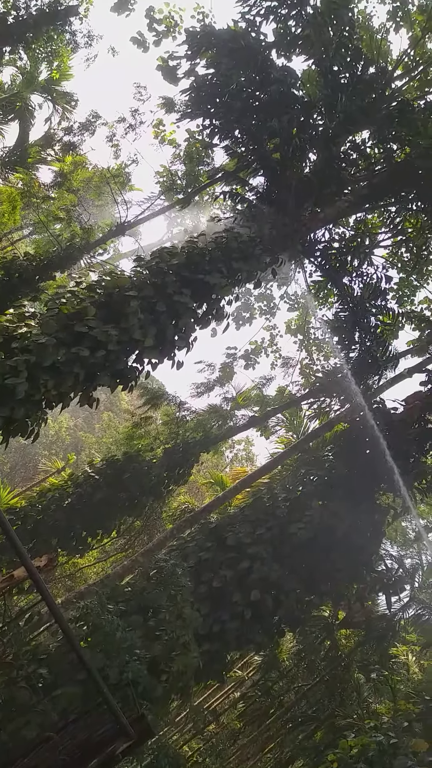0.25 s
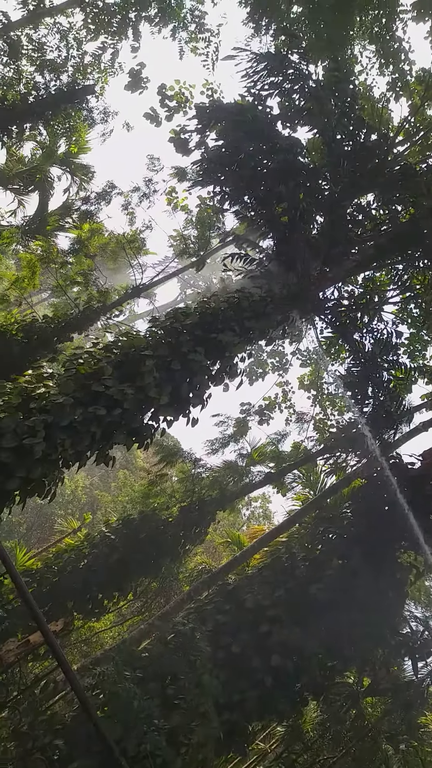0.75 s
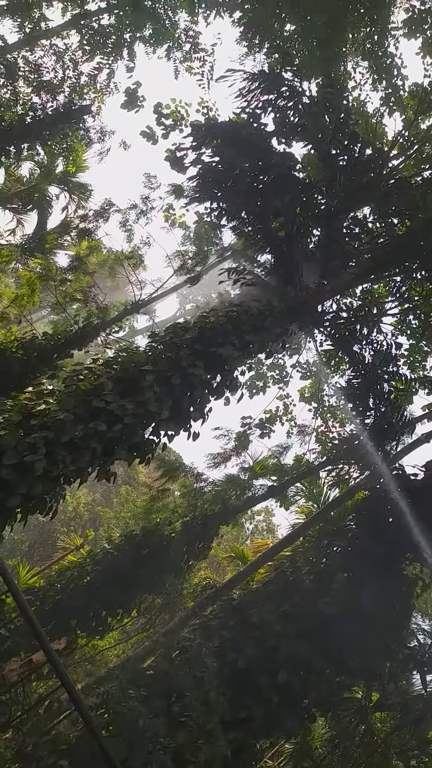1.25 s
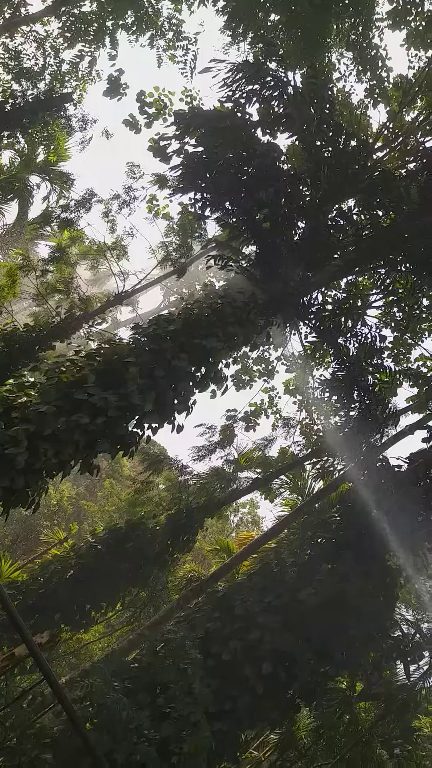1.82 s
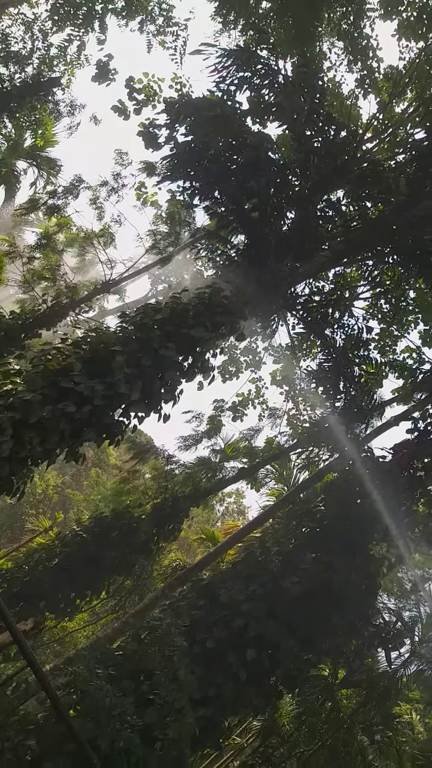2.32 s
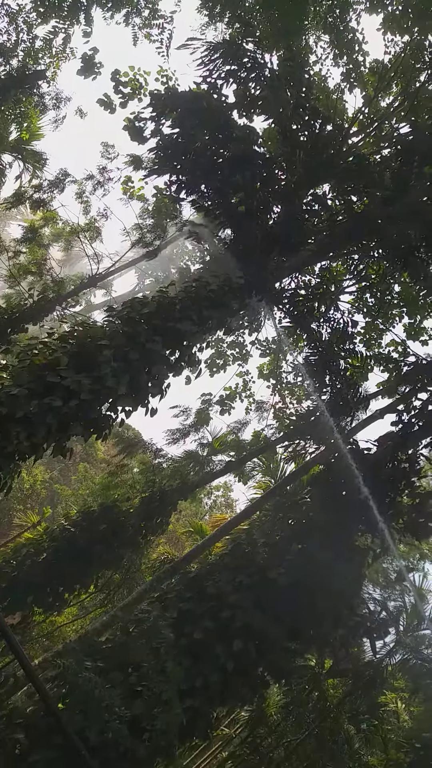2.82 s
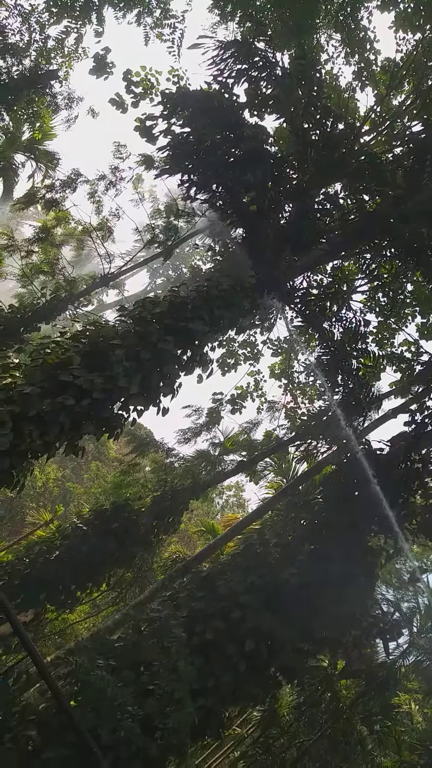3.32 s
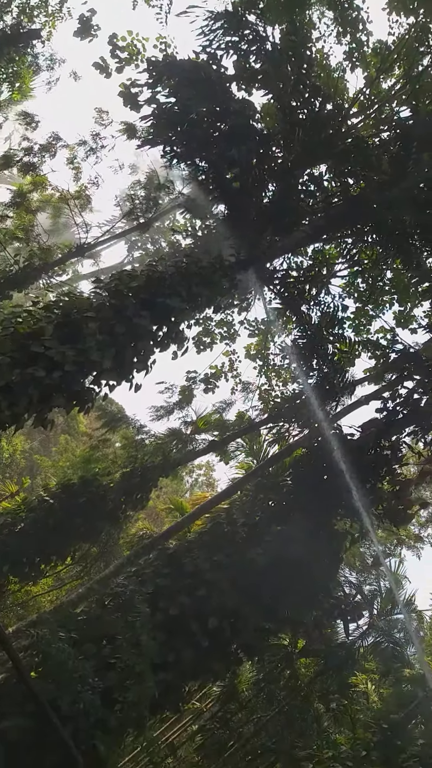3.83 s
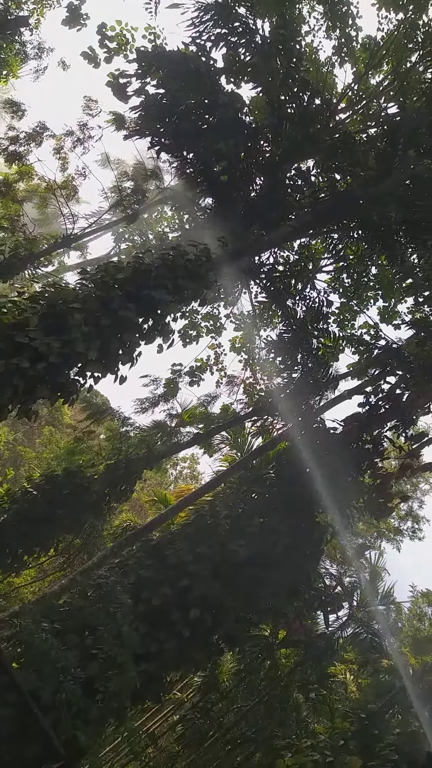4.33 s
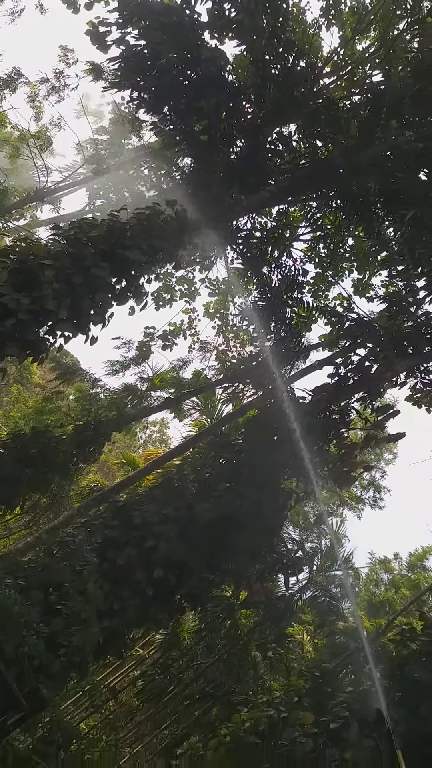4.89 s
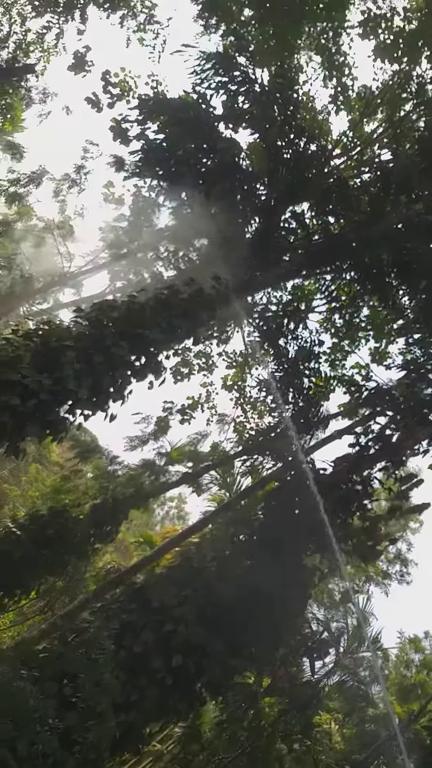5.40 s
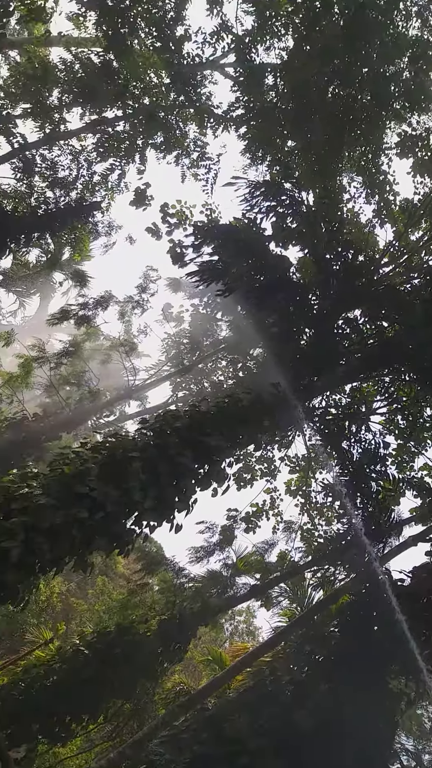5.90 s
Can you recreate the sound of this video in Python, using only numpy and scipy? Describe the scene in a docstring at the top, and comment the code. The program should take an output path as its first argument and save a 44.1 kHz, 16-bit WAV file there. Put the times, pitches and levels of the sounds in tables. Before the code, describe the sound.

Outdoors among leafy trees, a pressurised water jet hisses without pause and spatters on foliage. It starts moderate, surges into dense slapping and crackling after one second, settles into uneven patter, then bursts hard again near five and a half seconds. A soft rain wash and dull low thuds lie beneath, with a few faint bird chirps. Small device microphone, fairly close, bright and thin with little bass.

```python
"""A sprinkler jet sweeps through tree leaves in a grove, picked up by a small two-port microphone.
One shower of noisy drops is filtered into spatter, patter, slaps and drumming, swelling at crossings and gouts.
Dense tiny bursts make the nozzle hiss, narrow noise bands sing on single leaves, and low noise thuds on the ground.
Behind it lie a rain wash of patchy noise with a steady low-pitched part, and gliding whistles of far birds."""
import sys
import numpy as np
from scipy import signal
from scipy.fft import rfft, irfft, next_fast_len
from scipy.io import wavfile
from scipy.ndimage import uniform_filter1d

SR = 44100
rng = np.random.default_rng(int(sys.argv[2]) if len(sys.argv) > 2 else 0)


def to_wav(s):
    """Save 16-bit WAV."""
    ch = np.atleast_2d(s).T  # columns
    pcm = np.round(np.clip(ch, -1, 1) * 32767)  # PCM
    wavfile.write(sys.argv[1], SR, pcm.astype(np.int16))


N = 271215  # length in samples


def gain_of(db):
    """Turns dB into an amplitude factor."""
    return 10 ** (np.asarray(db) / 20)


def evened(x):
    """Scales a signal to rms 1."""
    return x / np.sqrt(np.mean(x ** 2) + 1e-20)


def read(points, hz, axis=1):
    """Joins a table of (Hz, value, ..) by straight lines on a log-frequency axis."""
    table = np.transpose(points)
    return np.interp(np.log(hz + 1), np.log(table[0] + 1), table[axis])


def curve(table, axis):
    """Joins a dB column of a time table by straight lines and gives a gain per sample."""
    rows = np.transpose(table)
    return gain_of(np.interp(np.arange(N) / SR, rows[0], rows[axis]))


def coloured(x, db_points):
    """Filters a whole signal by a spectrum in dB."""
    size = next_fast_len(len(x))
    hz = np.fft.rfftfreq(size, 1 / SR)
    return irfft(rfft(x, size) * gain_of(read(db_points, hz)), size)[:len(x)]


def band_level(x, points, lo_hz, hi_hz):
    """Colours x and scales it to rms 1 between lo_hz and hi_hz as heard through the overall colour."""
    x = coloured(x, points)
    heard = rfft(coloured(x, COLOUR_BASS + COLOUR_TREBLE))
    hz = np.fft.rfftfreq(len(x), 1 / SR)
    inside = (hz > lo_hz) & (hz < hi_hz)
    return x * len(x) / np.sqrt(2 * np.sum(abs(heard[inside]) ** 2))


FRAME, HOP = 512, 128  # spectral frame and step, samples


def patchy(x, patch_db, flicker_db):
    """Lets patches of time and frequency swell and fade, and the whole flicker as gouts of water land."""
    z = signal.stft(x, nperseg=FRAME, noverlap=FRAME - HOP)[2]
    patches = rng.standard_normal(z.shape[::-1]).T
    patches = uniform_filter1d(patches, size=8, axis=0)  # frequency bins
    patches = evened(uniform_filter1d(patches, size=14, axis=1))  # time frames
    flicker = evened(uniform_filter1d(rng.standard_normal(z.shape[1]), size=12))
    z = z * gain_of(patch_db * patches + flicker_db * flicker)
    return evened(signal.istft(z, nperseg=FRAME, noverlap=FRAME - HOP)[1][:N])


def drops(per_s, spread_db, ring_s, count=16):
    """Drops of random size each ring one leaf: a noise burst dying within ring_s; all leaves sum to white."""
    size_db = spread_db * np.minimum(rng.exponential(1, N), 4.2)
    size = gain_of(size_db) * (rng.random(N) < per_s / SR)
    leaf, t = rng.integers(0, count, N), np.arange(512) / SR
    spectra = rfft(rng.standard_normal((count, len(t))) * gain_of(-60 * t / ring_s))
    # whiten the leaves as a set, then centre each burst in its window
    spectra = spectra / np.sqrt(np.mean(abs(spectra) ** 2, axis=0))
    taps = np.roll(irfft(spectra), len(t) // 2, axis=1)
    return evened(sum(signal.oaconvolve(size * (leaf == k), tap)[:N] for k, tap in enumerate(taps)))


def wobble(size, width_hz):
    """A randomly turning phasor of rms 1 whose spectrum is width_hz wide."""
    r = np.exp(-np.pi * width_hz / SR)
    z = rng.standard_normal((28000, 2)) @ [1, 1j]  # longer than any note, so the filter has settled
    return signal.lfilter([1], [1, -r], z)[-size:] * np.sqrt((1 - r * r) / 2)


def note(s, length, start_hz, end_hz, db, width_hz, pure):
    """A glide placed at s, part pure tone and part narrow noise, with the overall colour undone at start_hz."""
    t, out = np.arange(round(length * SR)) / SR, np.zeros(N)
    glide_hz = start_hz + (end_hz - start_hz) * t / length
    tone = np.exp(2j * np.pi * np.cumsum(glide_hz) / SR)
    pure = np.clip(pure, 0, 1)
    blurred = tone * (pure + np.sqrt(1 - pure ** 2) * wobble(len(t), width_hz))
    level = gain_of(db - read(COLOUR_BASS + COLOUR_TREBLE, start_hz))
    shaped = level * np.sqrt(2) * blurred.real * signal.windows.tukey(len(t), .5)
    part = out[round(s * SR):][:len(t)]
    part += shaped[:len(part)]
    return out


def grove(x, low_db=1.9, high_db=1.1):
    """Echoes off trunks and ground lay a fine ripple over the spectrum, which drifts at random."""
    hz, _, z = signal.stft(x, SR, nperseg=2048)
    ripple = rng.standard_normal(z.shape[::-1]).T
    ripple = uniform_filter1d(ripple, size=3, axis=0)
    ripple = evened(uniform_filter1d(ripple, size=16, axis=1))
    depth_db = read([(300, .6), (900, low_db), (8000, high_db)], hz)[:, None]
    return signal.istft(z * gain_of(depth_db * ripple), SR, nperseg=2048)[1][:N]


# Tone of the low part of the rain wash. Each row: frequency in Hz, relative level in dB.
RAIN_BASS = [(30, 0.5), (105, 0), (150, -7), (260, -8), (330, -2.5), (520, 0), (650, -0.5), (900, -15)]
RAIN_BASS_DB = -77.5  # between 35 and 110 Hz


def rain_bass():
    """The steady low-pitched part of the rain wash: dull, even noise under the water."""
    return gain_of(RAIN_BASS_DB) * band_level(rng.standard_normal(N), RAIN_BASS, 35, 110)


# Tone of the rain of drops. Each row: frequency in Hz, relative level in dB.
RAIN = [(30, 13), (100, 1.5), (400, 0.5), (2000, 0), (6000, -3), (12000, -0.5)]
RAIN_DB = -37.5  # before the overall trim


def rain():
    """Drops falling through the grove blend into a far, even wash of gently patchy noise."""
    wash = patchy(rng.standard_normal(N), patch_db=1.0, flicker_db=.3)
    return gain_of(RAIN_DB) * band_level(wash, RAIN, 20, 20600)


# Far bird calls. Each row: start in seconds, length in seconds, start pitch in Hz, end pitch in Hz,
# level in dB, blur width in Hz.
BIRDS = [(1.875, .1, 1160, 1217, -42, 70), (1.93, 0.053, 4680, 4600, -33, 90),
         (2.14, .065, 3950, 3820, -35, 60), (2.52, 0.059, 3100, 3000, -41, 50),
         (2.72, 0.047, 3140, 3090, -40, 50), (2.97, 0.084, 3180, 3100, -42, 50),
         (3.14, .09, 1200, 1173, -41.5, 80), (3.23, .12, 1170, 1124, -44.5, 80),
         (3.23, .09, 3150, 3180, -40, 50), (5.891, .029, 2980, 2960, -35.5, 40),
         (5.921, .03, 3020, 3000, -35.5, 40)]


def birds():
    """Short gliding whistles, blurred by distance and foliage."""
    return sum(note(*row, pure=.93) for row in BIRDS)


# Water landing on soft ground. Each row: time in seconds, level in dB before the overall trim.
GROUND = [(0.0, -73), (0.3, -67), (1.05, -65), (1.19, -55.5), (1.6, -59), (1.73, -69), (1.87, -62),
          (2.2, -60), (2.5, -62), (2.72, -67), (3.94, -72), (4.5, -62.5), (4.86, -56), (4.95, -64.5),
          (6.15, -68)]
# Tone of the ground thud. Each row: frequency in Hz, relative level in dB.
THUD = [(70, -25), (135, -6), (200, -2), (280, -6), (500, -40)]
LUMPY_DB = 1.5  # rms depth of the slow level lumps


def ground_thud():
    """Water on soft ground gives a low, dull noise whose level lumps up and down."""
    lumps = evened(uniform_filter1d(rng.standard_normal(N), size=4000))
    thud = band_level(rng.standard_normal(N), THUD, 120, 267)
    return thud * curve(GROUND, axis=1) * gain_of(LUMPY_DB * lumps)


# The jet rests on one leaf or stem. Each row: start in seconds, length in seconds, centre in Hz,
# level in dB before the overall trim, bandwidth in Hz.
SINGING = [(.5, .15, 900, -39.5, 200), (1.87, 0.09, 4900, -35, 500), (2.35, .07, 4900, -34, 400),
           (3.3, 0.042, 3750, -36, 300), (4.432, 0.084, 4710, -33, 400), (4.722, .06, 2380, -35, 250),
           (4.8, .55, 2550, -40, 400), (5.479, .16, 4310, -31.5, 300), (5.49, 0.31, 5840, -34, 350),
           (6.1, .05, 3680, -38, 400)]


def singing():
    """A leaf or stem held in the jet sings as a narrow band of noise that swells and fades."""
    return sum(note(s, length, hz, hz, db, width_hz, pure=0) for s, length, hz, db, width_hz in SINGING)


# Nozzle hiss. Each row: time in seconds, level in dB before the overall trim.
NOZZLE = [(0.0, -40.5), (0.49, -37.5), (1.05, -39), (1.44, -37), (1.78, -39), (2.17, -37), (2.65, -40),
          (3.32, -39), (3.8, -44), (4.15, -39), (4.64, -35), (4.76, -38), (5.34, -37), (5.43, -34),
          (5.57, -32), (5.84, -38.5), (6.15, -39.5)]
# Tone of the hiss. Each row: frequency in Hz, relative level in dB.
HISS = [(1500, -22), (5000, -15.5), (9000, -1.5), (12000, 0.5), (15500, 0.5)]


def nozzle():
    """Fine spray tearing off the jet: a dense fizz of tiny bursts."""
    bursts = drops(12000, spread_db=3.0, ring_s=.0015)
    fizz = patchy(bursts + 0.38 * rng.standard_normal(N), patch_db=1.0, flicker_db=0.54)
    return band_level(fizz, HISS, 10200, 15530) * curve(NOZZLE, axis=1)


RISE_S, FALL_DB_PER_S = 0.046, 48


def crossing(start, hold):
    """A quick linear rise as the jet meets thick growth, a hold, then an even fall in dB."""
    t = np.arange(N) / SR - start
    fall_db = -FALL_DB_PER_S * np.maximum(t - RISE_S - hold, 0)
    return np.clip(t / RISE_S, 0, 1) * gain_of(fall_db)


# All levels in these three tables are before the overall trim.
# The jet wandering in thin foliage. Each row: time in seconds, fine spatter in dB,
# slap on broad leaves in dB, drumming on thick growth in dB.
JET = [(0.0, -42.5, -36.5, -43), (0.43, -39, -38.5, -46), (0.8, -34, -40.5, -48), (0.97, -33.5, -40, -49),
       (1.7, -35, -44, -52), (1.86, -39, -42, -48), (1.95, -34, -42, -47), (2.16, -35, -41, -48),
       (2.28, -34.5, -36, -44), (2.6, -36.5, -36, -44), (2.89, -39, -37.5, -47), (3.13, -34.5, -39, -48),
       (3.5, -39, -41, -51), (3.96, -37.5, -40.5, -50), (4.6, -31.5, -40.5, -48), (4.74, -34, -35.5, -46),
       (5.36, -33.5, -36, -44), (5.86, -34.5, -42, -50), (6.15, -35.5, -38.5, -46)]
# The jet crosses thick growth. Each row: start in seconds, hold in seconds, fine spatter in dB,
# slap in dB, drumming in dB.
CROSSINGS = [(0.474, 0.12, -32, -35, -40), (1.022, 0.4, -28.5, -32.5, -44), (5.374, 0.25, -28, -34, -42.5)]
# Single gouts slapping a leaf. Each row: peak time in seconds, fine spatter in dB, slap in dB, drumming in dB.
GOUTS = [(.515, -34, -37, -39), (1.011, -34, -32, -41), (1.11, -35, -30, -42), (1.165, -32, -34, -45),
         (1.2, -34, -32, -43), (1.3, -35, -33, -41), (1.42, -30, -40, -46), (1.49, -39, -33, -44),
         (1.575, -30, -36, -46), (1.885, -35, -48, -48), (2.4, -33.5, -40, -45), (2.53, -39, -37, -45),
         (3.19, -40, -38.5, -45), (3.32, -34, -40.5, -45), (3.41, -35, -37.5, -49), (4.86, -34, -29.5, -39),
         (5.18, -35, -36, -44), (5.52, -32, -35, -36), (5.547, -27, -33, -40), (5.566, -29, -32, -32),
         (5.93, -35, -46, -50)]
GOUT_S = .012  # from the peak to 1/e of its power


def strengths():
    """Gains of spatter, slap and drumming: the powers of the wandering jet, crossings and gouts add."""
    t = np.arange(N) / SR
    power = np.array([curve(JET, axis=k) for k in (1, 2, 3)]) ** 2
    for start, hold, *db in CROSSINGS:
        power = power + np.outer(gain_of(db), crossing(start, hold)) ** 2
    for s, *db in GOUTS:
        bump = np.exp(-np.minimum(((t - s) / GOUT_S) ** 2, 50))
        power = power + np.outer(gain_of(db) ** 2, bump)
    return np.sqrt(power)


# Tones of the struck surfaces. Each row: frequency in Hz, relative level in dB.
SPATTER = [(2500, -29.5), (4300, -6.5), (5000, 0.5), (7000, 1), (9500, -2), (15000, -11)]
PATTER = [(2000, -26), (2900, -4.5), (3600, -0.5), (4400, -4.5), (6000, -28.5)]
SLAP = [(1100, -27.5), (1500, -3), (2000, -0.5), (2700, -4), (3800, -30.5)]
DRUMMING = [(200, -28), (400, -6), (900, -2.5), (1300, -1.5), (2000, -42)]
# patter lies between spatter and slap: share of spatter, offset in dB
PATTER_FINE, PATTER_DB = 0.54, -0.22


def jet():
    """One shower of drops drives every struck surface, so that they flicker together."""
    shower = drops(9000, spread_db=3.0, ring_s=.003) + 0.66 * rng.standard_normal(N)
    shower = patchy(shower, patch_db=0.73, flicker_db=0.17)
    fine, coarse, deep = strengths()
    between = gain_of(PATTER_DB) * fine ** PATTER_FINE * coarse ** (1 - PATTER_FINE)
    spatter = band_level(shower, SPATTER, 3900, 9600) * fine
    patter = band_level(shower, PATTER, 2400, 5300) * between
    slap = band_level(shower, SLAP, 1350, 3100) * coarse
    drumming = band_level(shower, DRUMMING, 380, 1650) * deep
    return spatter + patter + slap + drumming


def scene():
    """Most water sounds pass through the grove and a trim; birds and the low part of the rain join directly."""
    water = jet() + ground_thud() + singing() + nozzle() + rain()
    heard = gain_of(-0.68) * grove(water) + birds() + rain_bass()
    return np.array([heard, heard])


# Overall colour of the sound, lower part, with a narrow low bump at 44 Hz.
# Each row: frequency in Hz, level in dB.
COLOUR_BASS = [(33, -50), (44, -27), (60, -32.5), (110, -22.5), (180, -21), (260, -23.5), (370, -10.5),
               (470, -15.5), (700, -10.5), (1090, -6.5), (1330, -8.5), (1540, -5.5), (1615, -1)]
# Overall colour, treble with the microphone's cavity resonances. Each row: frequency in Hz, level in dB.
COLOUR_TREBLE = [(1700, -2.5), (1870, 0), (2250, -1.5), (2800, -4.5), (3600, -1.5), (4500, -3.5),
                 (5000, -2), (7400, -7), (8200, -5.5), (8900, -7), (10100, -17), (11800, -11.5),
                 (13400, -11.5), (14100, -8.5)]
# The two ports differ near two cavity resonances. Each row: frequency in Hz, left over right in dB,
# left's phase lead in radians, likeness (1 = no stray part).
PORTS = [(1380, 0, 0, 1), (1600, 0, 0.1, 0.99), (1880, 4.5, -0.018, 0.98), (2250, 0.6, -0.2, 0.99),
         (2650, 0, 0, 1), (8720, 0, 0, 1), (9500, -2, -.21, 0.97), (9850, 0, -.08, 0.89),
         (10200, -3, .15, 0.86), (10400, 0, 0, 1)]
EDGE_HZ = 15730  # upper band limit


def record(dry):
    """Overall colour, the unlike ports, then the band limit."""
    z = signal.stft(coloured(dry.mean(0), COLOUR_BASS + COLOUR_TREBLE), nperseg=2048)[2]
    hz = np.fft.rfftfreq(2048, 1 / SR)
    db, lead, same = (read(PORTS, hz, axis=k)[:, None] for k in (1, 2, 3))
    # the unshared part arrives from other directions: random phase, opposite sign in the two ports
    turn = np.exp(2j * np.pi * rng.random(z.shape[::-1]).T)
    stray = abs(z) * turn * np.sqrt(1 - np.clip(same, 0, 1))
    # each port takes half of the level and phase difference; their gains average 1
    half = gain_of(db / 2) * np.exp(1j * lead / 2)
    pair = np.array([(z + stray) * half, (z - stray) / half]) * 2 / (abs(half) + 1 / abs(half))
    ports = signal.istft(pair, nperseg=2048)[1][:, :N]
    low_pass = signal.firwin(2047, EDGE_HZ, window=("kaiser", 10), fs=SR)
    return signal.oaconvolve(ports, low_pass[None], "same")


dry = scene()
out = record(dry)
to_wav(out)
```